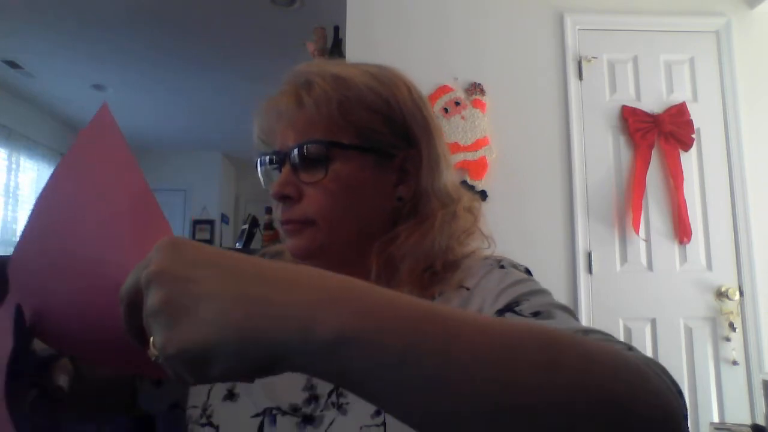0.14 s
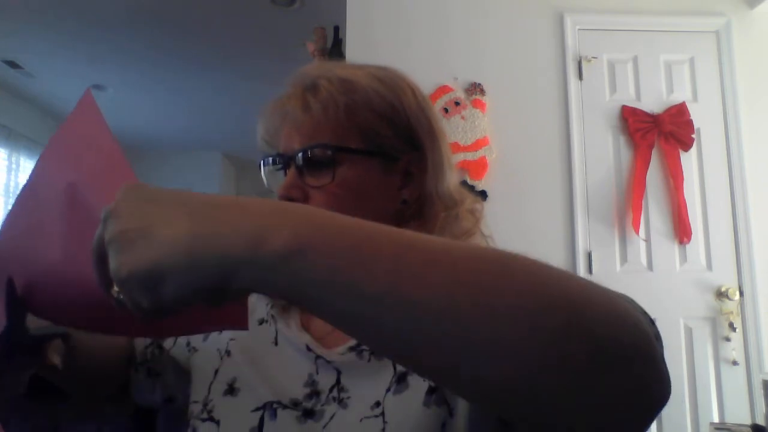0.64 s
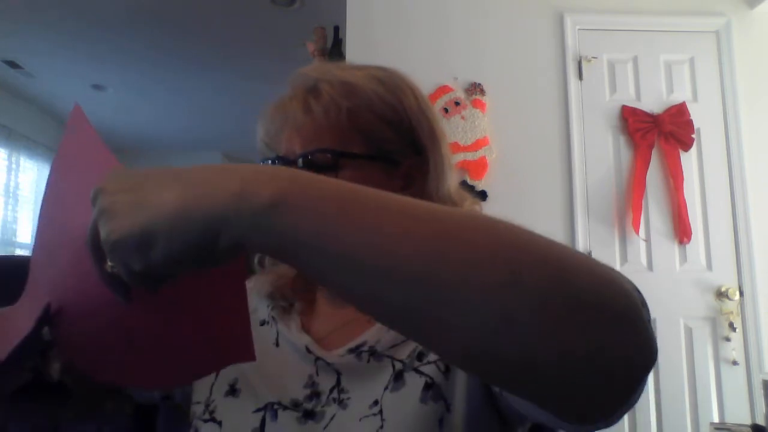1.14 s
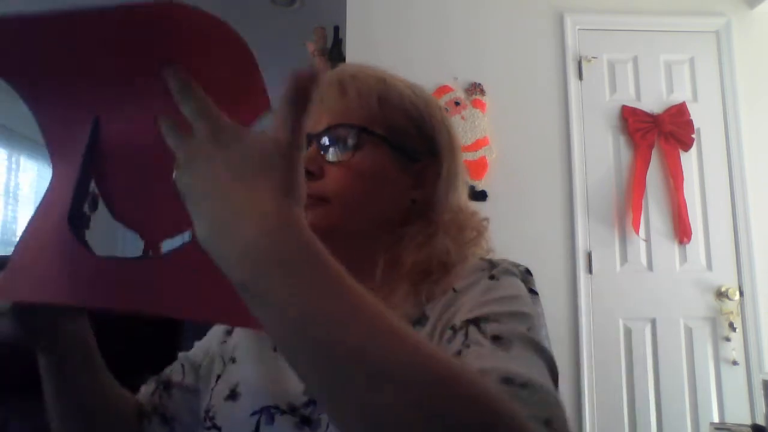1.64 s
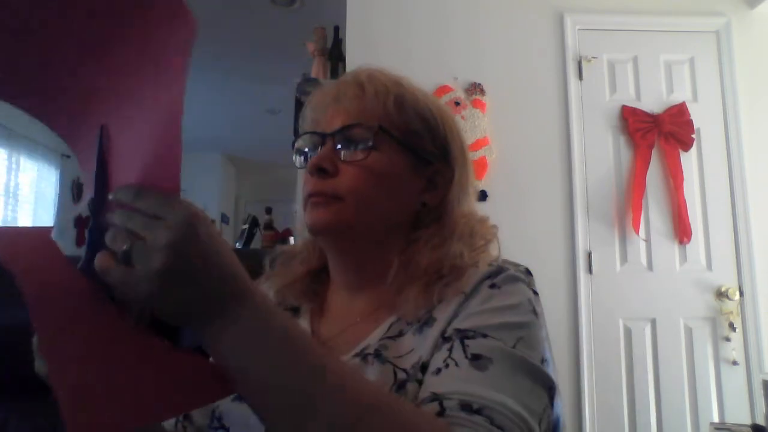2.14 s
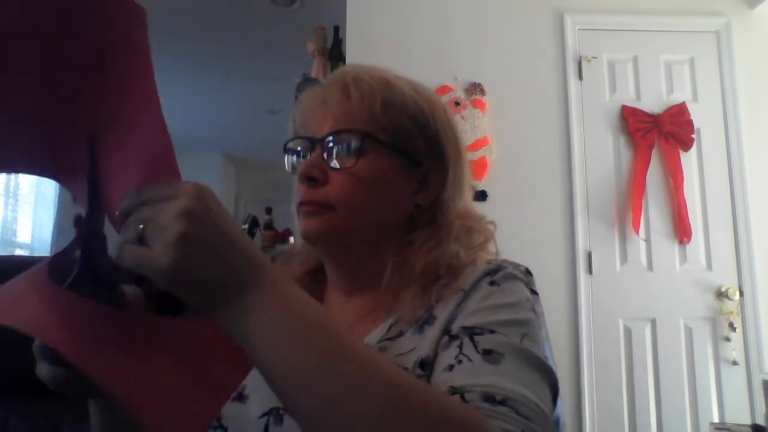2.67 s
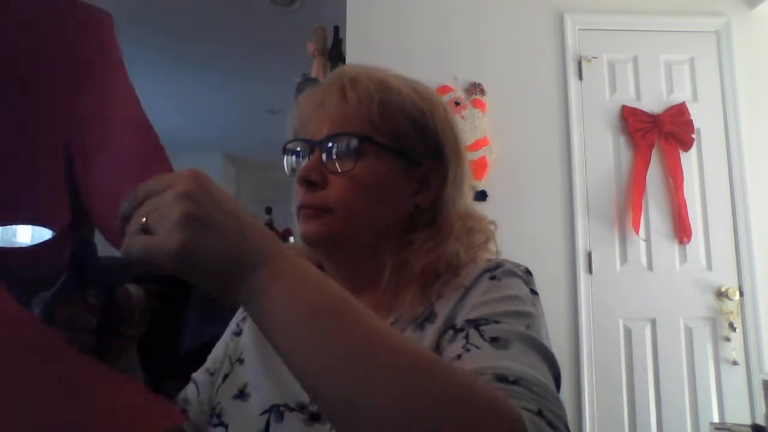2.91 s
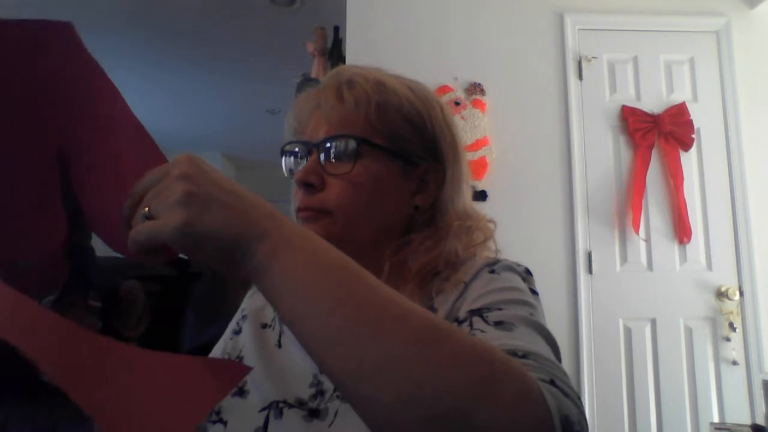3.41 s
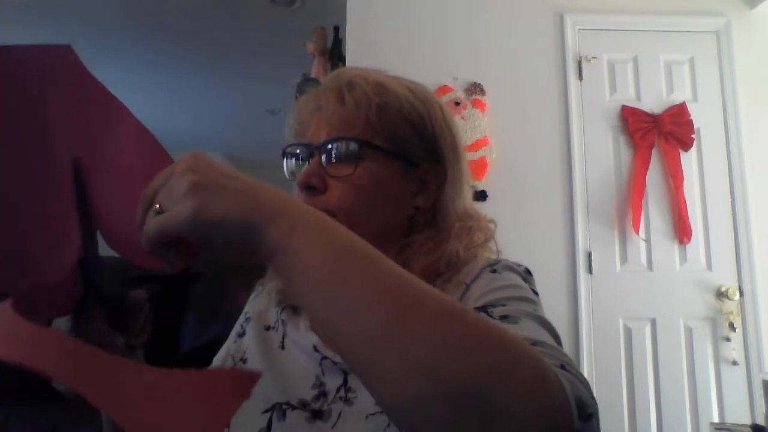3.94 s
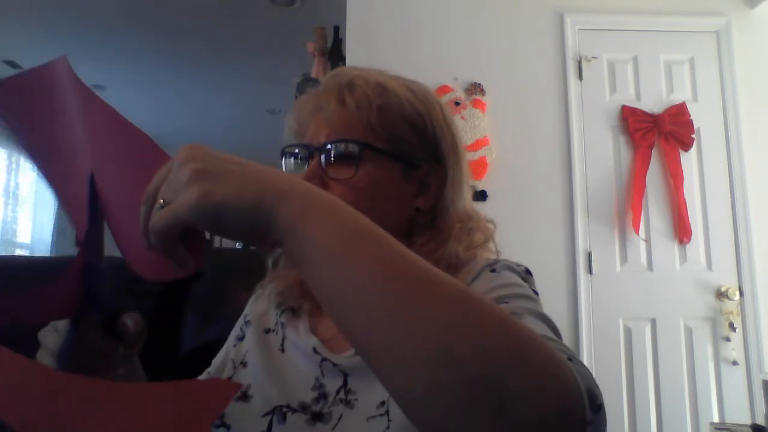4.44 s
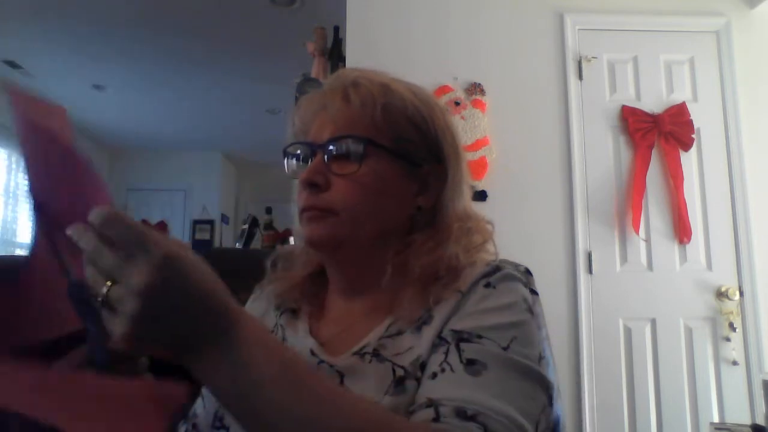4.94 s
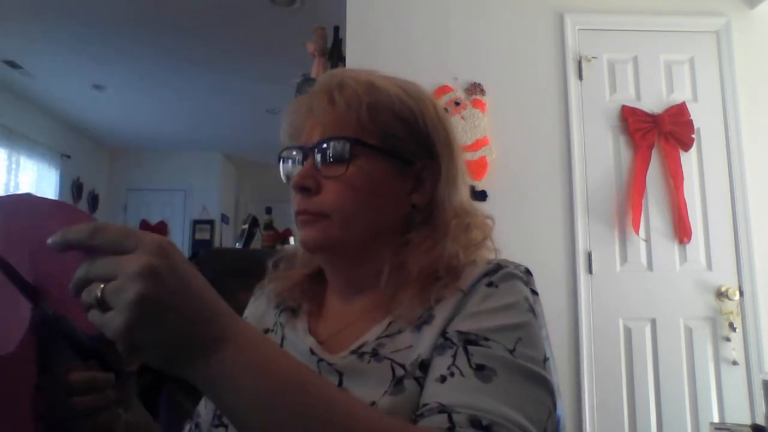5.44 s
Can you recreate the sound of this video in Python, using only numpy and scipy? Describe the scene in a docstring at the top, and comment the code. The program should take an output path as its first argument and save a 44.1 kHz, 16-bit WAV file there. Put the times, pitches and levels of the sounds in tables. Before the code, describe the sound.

Close, crisp cutting of construction paper: brief snips and snaps, the sheet flapping and rustling between bursts, in a quiet furnished room.

```python
"""Scissors snip through stiff paper in short strokes close to a small microphone.
Each stroke tears fibres in a dense run of grains that ring the sheet and the cutting edge.
Resonant noise bursts make the sheet's snaps, low decaying tones its dull knocks. Between strokes
filtered fibre noise gives pushed air, flap, rustle and fizz, in a quiet furnished room."""
import sys
import numpy as np
from scipy import signal
from scipy.fft import rfft, irfft, next_fast_len
from scipy.io import wavfile
from scipy.ndimage import uniform_filter1d, map_coordinates

SR = 44100
rng = np.random.default_rng(int(sys.argv[2]) if len(sys.argv) > 2 else 0)


def undo_db(level):
    """Turn decibels back into plain size, where 20 dB means ten times bigger."""
    steps = np.asarray(level, float) / 20
    return 10 ** steps


def output_pcm(signal):
    """Save a mono or channel-first signal as 16-bit PCM at the path in sys.argv[1].

    Samples are clipped to [-1, 1] before scaling.
    """
    pcm = np.clip(np.atleast_2d(signal).T, -1, 1) * 32767
    wavfile.write(sys.argv[1], SR, np.round(pcm).astype(np.int16))


N = 245637

# resonances of the cutting edge: f/Hz, width/Hz, level/dB
EDGE_MODES = [(3000, 1600, -1.5), (5000, 670, 1.5), (5720, 1770, -4.5), (8150, 1140, -2.5),
              (9650, 3170, -8)]


def unit(x):
    """Scaled to rms 1."""
    return x / np.sqrt(np.mean(x ** 2) + 1e-20)


def along(points, hz):
    """(f/Hz, value) points interpolated on a log frequency axis."""
    f, v = np.transpose(points)
    return np.interp(np.log(hz + 1), np.log(f + 1), v)


def filtered(x, response):
    """x through a complex response of frequency."""
    m = next_fast_len(N + 8192)
    return irfft(rfft(x, m) * response(np.fft.rfftfreq(m, 1 / SR)), m)[:N]


def shaped(x, points):
    """x through a gain curve of (f/Hz, gain/dB) points."""
    return filtered(x, lambda hz: undo_db(along(points, hz)))


def ringing(modes):
    """Causal response of a set of resonances, alternating in sign."""
    def response(f):
        total = 0
        for k, (centre_hz, width_hz, db) in enumerate(modes):
            damping = 1j * f * width_hz
            total = total + (-1) ** k * undo_db(db) * damping / (centre_hz ** 2 - f * f + damping)
        return total
    return response


def wobble(rate_hz):
    """A smooth random curve, rate_hz knots a second (400 at most)."""
    knots = rng.standard_normal(int(N * 400 / SR) + 4)
    return map_coordinates(knots, [np.arange(N) * min(rate_hz, 400) / SR])


def fibres(rate_hz, spread_db, clump_db):
    """Fibres breaking: random ticks of uneven size that come in clumps, over fine friction noise."""
    broken = rng.random(N) < rate_hz / SR
    ticks = broken * rng.standard_normal(N) * undo_db(spread_db * rng.standard_normal(N))
    grains = unit(ticks) + 1.19 * rng.standard_normal(N)
    return unit(grains * undo_db(clump_db * wobble(150)))


def patchy(x, depth_db):
    """Narrow bands swell and fade for some tens of ms, as the sheet's shape keeps changing."""
    z = signal.stft(x, nperseg=256)[2]
    field = uniform_filter1d(rng.standard_normal(z.shape), size=2, axis=0)
    field = uniform_filter1d(field, size=18, axis=1)
    return unit(signal.istft(z * undo_db(depth_db * unit(field)), nperseg=256)[1][:N])


def sheet_body(f):
    """The broad sheet rings low and radiates little above its top resonance."""
    # f/Hz, width/Hz, level/dB
    sheet_modes = [(399, 220, -2.5), (778, 740, 1), (1072, 413, 5), (1535, 480, 3.5), (2020, 680, -6.5)]
    top_hz = 2670
    return ringing(sheet_modes)(f) / (1 + 1j * f / top_hz - (f / top_hz) ** 2)


def handling():
    """Hands bend and slide the sheet: pushed air, a lumpy flap, a rustle and a fine fizz."""
    # sheet bends: deepest bend t/s, flap level/dB, pushed air re flap/dB, pace/(dB/s)
    bend_table = [(0.041, -58.5, 1, 500), (0.141, -60.5, -4, 125), (0.509, -61, -5, 145),
                  (0.801, -52.5, -3.5, 186), (1.04, -63, -2, 19), (1.15, -55, -22, 498),
                  (1.431, -56.5, -6.5, 300), (1.599, -40.5, -9, 293), (1.659, -32.5, -15.5, 273),
                  (2.059, -56, -1, 214), (2.3, -69, -5, 28), (2.54, -50.5, -16, 101),
                  (2.66, -53.5, -23, 350), (2.762, -53.5, -16, 250), (2.958, -53, -5, 200),
                  (3.1, -66, -9, 352), (3.29, -54, -13.5, 135), (3.472, -57, -3, 300),
                  (3.568, -51, -10, 300), (3.71, -56, -2.5, 148), (3.88, -68.5, 8, 282),
                  (4.051, -65, -3, 189.5), (4.298, -58.5, -12, 200), (4.4, -67, -8, 194.5),
                  (4.751, -63.5, -17, 135), (4.92, -65.5, -4, 30), (5.071, -56, -6, 397),
                  (5.269, -45, -8.5, 165), (5.411, -43, -16, 162)]
    # sheet slides through the fingers: t/s, rustle level/dB, fizz level/dB
    sliding_levels = [(0.0, -62, -64.5), (0.14, -88, -80), (0.65, -107, -89), (0.76, -64, -57.5),
                      (0.95, -77, -74.5), (1.13, -71, -64), (1.33, -87, -82), (1.49, -61, -55),
                      (1.62, -65, -50.5), (1.8, -72, -83), (1.94, -92, -87.5), (2.04, -50, -54.5),
                      (2.15, -78, -75.5), (2.39, -81, -74), (2.45, -56, -49), (2.64, -56, -53),
                      (2.72, -70, -71), (2.94, -48.5, -52.5), (3.15, -83, -78), (3.42, -66, -75),
                      (3.55, -55.5, -58.5), (3.8, -71, -72), (4.2, -82, -83.5), (4.401, -75, -62),
                      (4.55, -90.5, -95.5), (4.779, -94, -63), (5.08, -90, -64.5), (5.15, -73, -66),
                      (5.35, -57, -50), (5.57, -68, -61)]
    # spectra of pushed air, flap and fizz: f/Hz, relative level/dB
    push_spectrum = [(25, -23), (60, -18.5), (110, -1), (200, -4), (330, -16), (600, -51)]
    flap_spectrum = [(120, -35), (250, -5.5), (380, -5), (650, -5.5), (900, -9), (1200, -10.5), (2000, -45)]
    fizz_spectrum = [(1180, -69), (2000, 6.5), (2250, 1), (4850, 13), (8060, 6), (10600, 0.5), (11700, -17),
                     (15200, -51), (22000, -120)]
    bend_speedup = 1.63  # bending outpaces springing back
    bend_rustle_re_flap_db = -14.5

    t = np.arange(N) / SR
    flap_gain, push_gain = np.zeros(N), np.zeros(N)
    for s, flap_db, push_re_flap_db, pace in bend_table:
        away_s = np.where(t < s, bend_speedup * (s - t), t - s)
        bend = undo_db(flap_db - pace * away_s)
        flap_gain += bend
        push_gain += undo_db(push_re_flap_db) * bend
    s, rustle_db, fizz_db = np.transpose(sliding_levels)
    rustle_gain = undo_db(np.interp(t, s, rustle_db)) + undo_db(bend_rustle_re_flap_db) * flap_gain
    fizz_gain = undo_db(np.interp(t, s, fizz_db))

    bending = fibres(rate_hz=500, spread_db=2, clump_db=1.5)
    push = patchy(shaped(bending, push_spectrum), depth_db=1.5)
    flap = patchy(shaped(bending, flap_spectrum), depth_db=2.5)
    sliding = fibres(rate_hz=1500, spread_db=3.5, clump_db=2.5)
    rustle = patchy(filtered(sliding, sheet_body), depth_db=2.2)
    fizz = patchy(shaped(sliding, fizz_spectrum), depth_db=2.4)
    low = undo_db(1.5 * wobble(25)) * (push_gain * push + flap_gain * flap)
    return low + undo_db(1.6 * wobble(30)) * (rustle_gain * rustle + fizz_gain * fizz)


def room_tone():
    """The faint steady air of the room: shaped noise."""
    # f/Hz, relative level/dB
    tone_spectrum = [(24, -51), (40, 0), (108, 1.5), (294, -5), (391, -13), (484, -26), (964, -16),
                     (1960, -20), (5330, -27), (11700, -30), (15200, -49), (22000, -120)]
    rms_db = -76
    return undo_db(rms_db) * unit(shaped(rng.standard_normal(N), tone_spectrum))


def strokes():
    """Each stroke rises quickly, tears for its length and stops as the blades halt."""
    # blade strokes and slides: t/s, length/s, initial sheet level/dB, edge re sheet/dB, edge pitch f/Hz
    cuts = [(0.003, 0.034, -74.5, 13.5, 2800), (0.077, 0.055, -55.5, 5, 4500),
            (0.105, 0.069, -61.5, 7, 2920), (0.184, 0.029, -58.5, 6.5, 2770),
            (0.223, 0.012, -57.5, 8.5, 2730), (0.317, 0.09, -72, 3, 2730), (0.41, 0.049, -71.5, 10, 2650),
            (0.475, 0.075, -49, 7, 4070), (0.538, 0.036, -54, 5, 4540), (0.674, 0.12, -71, 8.5, 3900),
            (0.838, 0.027, -48, 14, 4450), (0.859, 0.035, -46.5, 14.5, 4800), (1.055, 0.09, -66, 4.5, 2430),
            (1.163, 0.034, -73, 6.5, 2750), (1.284, 0.016, -45, 6, 3940), (1.311, 0.054, -47, 3, 2510),
            (1.398, 0.033, -48.5, 2, 3700), (1.453, 0.022, -45, 1.7, 3270), (1.489, 0.022, -49, 2, 4700),
            (1.543, 0.068, -61, 12.5, 5100), (1.584, 0.059, -33.5, -8.5, 4800),
            (1.633, 0.049, -27, -12.5, 2880), (1.692, 0.053, -54.5, -1.5, 3350),
            (1.955, 0.083, -63, -6, 2720), (2.031, 0.016, -37.5, -3.5, 3010),
            (2.057, 0.034, -57.5, 3.5, 3070), (2.345, 0.026, -53, -12, 3900), (2.402, 0.19, -40, 0, 4000),
            (2.601, 0.059, -43.5, 2.5, 3400), (2.74, 0.033, -42, 7, 5080), (2.783, 0.02, -38.5, 1.5, 4300),
            (2.911, 0.054, -47.5, 5, 4700), (3.03, 0.076, -62, 0, 5500), (3.231, 0.062, -54.5, -1.5, 5740),
            (3.263, 0.047, -54.5, 1.3, 5430), (3.314, 0.05, -45.5, 1.5, 4700),
            (3.365, 0.027, -49, -5, 4650), (3.464, 0.019, -25, -15.5, 3080), (3.484, 0.033, -41, 0.5, 4440),
            (3.525, 0.07, -50.5, -1.5, 4530), (3.632, 0.035, -42, 4.5, 4800),
            (3.662, 0.037, -40, 2.5, 4770), (3.7, 0.015, -33.5, 1.5, 5000), (3.728, 0.02, -48.5, 1, 4830),
            (3.827, 0.032, -51, -2.5, 4400), (3.852, 0.045, -48, -4, 4520),
            (3.987, 0.035, -58.5, 4.5, 5470), (4.01, 0.047, -52.5, 3, 5600), (4.12, 0.044, -69, -0.8, 6450),
            (4.237, 0.031, -63.5, -5.5, 6560), (4.284, 0.029, -68, -1, 6550),
            (4.356, 0.065, -58, -7.5, 3550), (4.702, 0.023, -63, 10.5, 5200), (4.731, 0.019, -57, 10, 8050),
            (4.76, 0.014, -59.5, 11, 4200), (4.78, 0.23, -79.5, 11, 8200), (5.037, 0.012, -63, 12.5, 4900),
            (5.062, 0.03, -67.5, -2, 3000), (5.205, 0.047, -63, 22, 8700), (5.26, 0.019, -33, 0, 2880),
            (5.266, 0.045, -28.5, -8.5, 3260), (5.329, 0.092, -43, -3, 4200),
            (5.394, 0.048, -42, -12, 3050), (5.441, 0.062, -57, 3.5, 4660)]
    # a hard stroke spends itself and fades, a light one swells
    even_db, fade_per_db = -59, 0.3749  # level that holds even; dB of fade per dB above it
    tearing = fibres(rate_hz=3000, spread_db=3, clump_db=2.5)
    sheet = patchy(filtered(tearing, sheet_body), depth_db=2.5)
    edge = patchy(filtered(tearing, ringing(EDGE_MODES)), depth_db=2.2)
    out = np.zeros(N)
    for s, length_s, sheet_db, edge_db, edge_hz in cuts:
        change_db = fade_per_db * (even_db - sheet_db)
        span = slice(round(s * SR), round((s + length_s + 0.1) * SR))
        t = np.arange(len(out[span])) / SR
        rise_s = 0.0024 + 0.13 * length_s  # longer strokes start more gently
        rise = 1 - np.exp(-(t / rise_s) ** 2)
        shape = rise * undo_db(sheet_db + change_db * np.minimum(t / length_s, 1))
        after_s = np.maximum(t - length_s, 0)
        # the free flap ahead of the cut favours one pitch, set by its size, and an overtone
        favoured = 0
        for ratio, share in ((1, 1), (1.68, 0.36)):
            b, a = signal.iirpeak(ratio * edge_hz, 4.5, SR)
            favoured = favoured + share * signal.lfilter(b, a, edge[span])
        bright = unit(edge[span] + 1.96 * favoured) * undo_db(edge_db - 60 * after_s / 0.015)
        out[span] += shape * (sheet[span] * undo_db(-60 * after_s / 0.023) + bright)
    return out


def knocks():
    """The whole sheet flexes and rings low for a few cycles, its pitch unsteady."""
    # t/s, initial level/dB, pitch f/Hz
    flexes = [(0.032, -43.5, 413), (0.361, -53, 359), (0.783, -41, 483), (0.808, -39, 389),
              (0.982, -51, 222), (1.007, -49.5, 240), (1.149, -46, 406), (1.225, -44, 337),
              (1.267, -53, 257), (1.421, -43.5, 372), (1.762, -46, 460), (2.031, -54, 582),
              (3.464, -31.5, 348), (5.24, -41, 236), (5.264, -33.5, 396), (5.398, -33, 442)]
    rise_s, t60_s = 0.00051, 0.059
    out, t = np.zeros(N + SR), np.arange(SR // 5) / SR
    for s, db, hz in flexes:
        drift = np.cumsum(rng.standard_normal(len(t))) * 0.018  # phase/rad
        ring = np.sin(2 * np.pi * hz * t + drift)
        ring += 0.3 * np.sin(2 * np.pi * 1.5 * hz * t - drift)
        envelope = (1 - np.exp(-t / rise_s)) * undo_db(db - 60 * t / t60_s)
        out[round(s * SR):][:len(t)] += envelope * ring
    return out[:N]


def snaps():
    """A buckle is a few ms of crunch through the same resonances; its treble dies first."""
    # sheet buckles: t/s, initial noise level/dB, edge re sheet/dB
    buckles = [(0.451, -44, 5), (0.791, -26.5, 6), (0.88, -23.5, 19), (0.899, -32, -2), (0.924, -22.5, 7.5),
               (1.116, -48, 4), (1.434, -23.5, 10.5), (1.62, -14, 5), (1.646, -25, -7), (1.667, -23, -14),
               (2.175, -33, -1), (2.25, -34, -16), (2.557, -28, 4), (2.644, -31, 15), (2.898, -34, 0.5),
               (3.179, -50, 12.5), (3.466, -10.5, -31), (4.16, -36, 0), (4.39, -33.5, -10), (4.415, -39, 6),
               (5.271, -13.5, 21), (5.397, -17.5, 18.5), (5.401, -16, 11.5)]
    rise_s, t60_s = 0.002, 0.021
    low, high, t = np.zeros(N + SR), np.zeros(N + SR), np.arange(SR // 10) / SR
    for s, db, edge_db in buckles:
        envelope = (1 - np.exp(-(t / rise_s) ** 2)) * undo_db(db - 60 * t / t60_s)
        crack = envelope * rng.standard_normal(len(t))
        start = round((s - 0.0015) * SR)  # the fold gives way just before it is heard
        low[start:][:len(t)] += crack
        high[start:][:len(t)] += undo_db(edge_db - 60 * t / 0.022) * crack

    def soft_edge(f):
        """A fold is blunter than a cut."""
        return ringing(EDGE_MODES)(f) / (1 + 1j * f / 5000)

    return filtered(low[:N], sheet_body) + filtered(high[:N], soft_edge)


def walls(x):
    """The room's answer: a noise tail in which each frequency dies at its own speed."""
    # f/Hz, t60/s
    decay = [(200, 0.42), (1500, 0.21), (10000, 0.13)]
    hz, t, z = signal.stft(rng.standard_normal(SR // 2), SR, nperseg=256)
    fade = undo_db(-60 * t / along(decay, hz)[:, None])
    tail = signal.istft(z * fade, SR, nperseg=256)[1]
    delayed = np.pad(x, (300, 0))  # samples
    return signal.fftconvolve(delayed, tail / np.linalg.norm(tail))[:N]


def scene():
    """Paper and scissors in the room."""
    paper = strokes() + snaps() + knocks()
    return (paper + undo_db(-8.5) * walls(paper) + handling() + room_tone())[None]


def microphone(x):
    """A small microphone: a narrow band and a trace of low-passed white hiss."""
    # f/Hz, gain/dB
    mic_response = [(25, -14), (50, -19.5), (100, 0.5), (200, -3.5), (10000, -2), (11200, -7), (11800, -27),
                    (12100, -73), (22050, -70)]
    white_db, hiss_top_hz = -103, 15500  # white level ahead of the low-pass
    hiss = undo_db(white_db) * filtered(rng.standard_normal(N), lambda hz: hz < hiss_top_hz)
    return shaped(x, mic_response) + hiss


def band_limit(x):
    """A steep low-pass at the top of the band."""
    return signal.sosfilt(signal.butter(12, 11810, fs=SR, output="sos"), x)


def record(dry):
    """The scene as the small microphone delivers it."""
    heard = microphone(dry[0])
    return band_limit(heard[None])


dry = scene()
out = record(dry)
output_pcm(out)
```